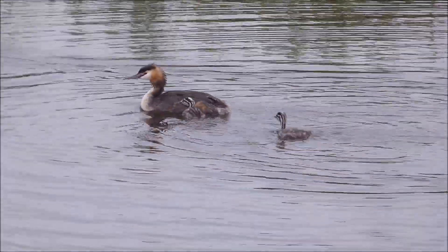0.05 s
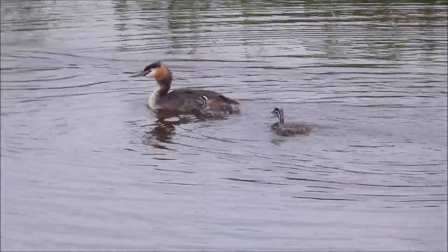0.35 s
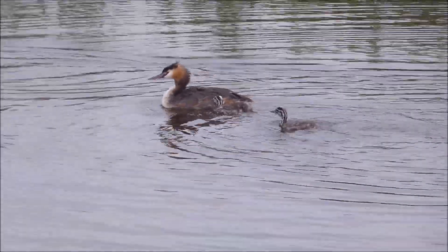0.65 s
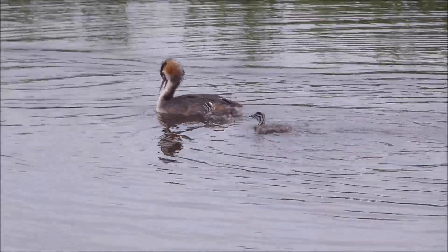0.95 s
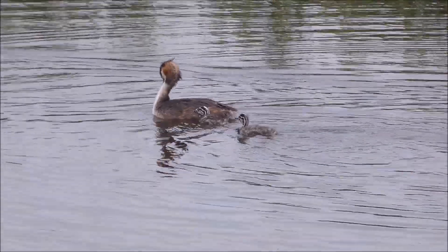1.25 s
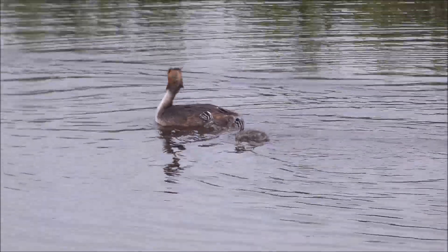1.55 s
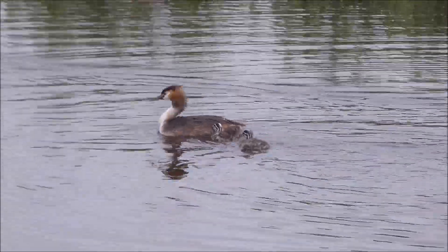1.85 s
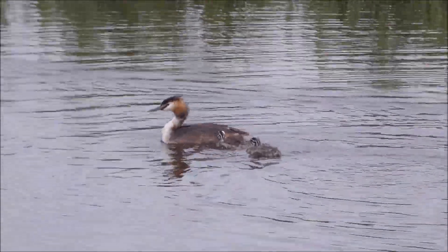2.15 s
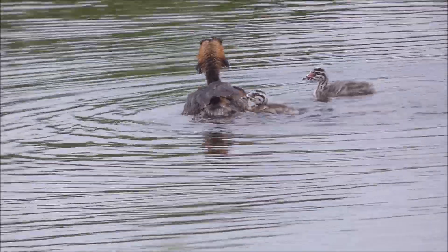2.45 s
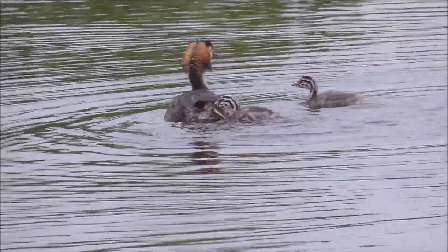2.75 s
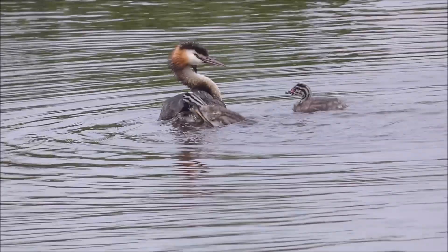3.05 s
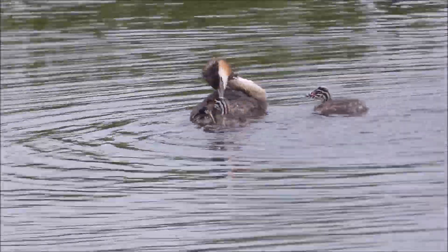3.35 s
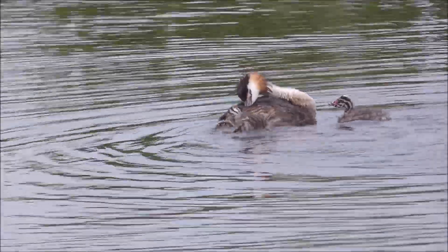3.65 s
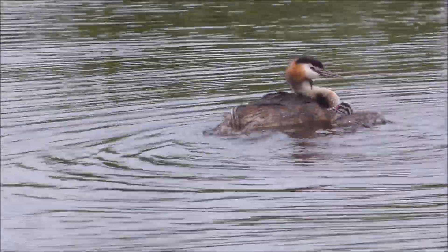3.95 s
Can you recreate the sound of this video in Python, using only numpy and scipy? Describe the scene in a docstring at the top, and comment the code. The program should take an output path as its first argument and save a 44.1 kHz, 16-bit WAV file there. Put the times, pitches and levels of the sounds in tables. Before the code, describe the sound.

Grebe chicks peep faintly and repeatedly on a pond while wind buffets the microphone over hiss and distant traffic. The sound cuts out briefly, then returns with louder traffic, fainter peeps and no gusts.

```python
"""Grebe chicks on a windy pond

Chicks peep, each peep leaping from a low register to a high whistle and back, and the bank echoes them.
Another water bird calls once and the water plips. Gusts buffet the microphone over hiss and far traffic.
The sound cuts out for a quarter second and returns with louder traffic, fainter peeps and no gusts."""
import sys
import numpy as np
from scipy import signal
from scipy.fft import rfft, irfft
from scipy.io import wavfile
from scipy.ndimage import uniform_filter1d

SR = 44100
rng = np.random.default_rng(int(sys.argv[2]) if len(sys.argv) > 2 else 0)


def file_out(sig):
    """Save sig as 16-bit WAV at sys.argv[1]."""
    # one column per channel
    cols = np.atleast_2d(sig).T
    # limit, then scale
    lim = np.clip(cols, -1, 1)
    pcm = np.round(lim * 32767).astype(np.int16)
    wavfile.write(sys.argv[1], SR, pcm)


N = 176400
T = np.arange(N) / SR
HZ = np.fft.rfftfreq(N, 1 / SR)
PAUSE_START_S, PAUSE_END_S = 2.3245, 2.5755


def amp(db):
    """Decibels to gain."""
    return 10 ** (np.asarray(db) / 20)


def unit(x):
    """Scale to rms 1."""
    return x / np.sqrt(np.mean(x ** 2) + 1e-20)


def curve(points, at, column=1):
    """Interpolate one table column linearly."""
    table = np.array(points, float)
    return np.interp(at, table[:, 0], table[:, column])


def spectrum(points):
    """Interpolate a table over log frequency."""
    hz, value = np.transpose(points)
    return np.interp(np.log(HZ + 1), np.log(hz), value)


def add(mix, start_s, sound):
    """Mix a sound in at start_s."""
    part = mix[max(round(start_s * SR), 0):][:len(sound)]
    part += sound[:len(part)]


def pan(db):
    """Channel gains; positive db is left."""
    return amp(np.array([[db], [-db]]) / 2)


def waver(rate_hz):
    """Random motion below rate_hz, rms 1."""
    return unit(irfft(rfft(rng.standard_normal(N)) / (1 + (HZ / rate_hz) ** 4), N))


def noise(gain, correlation):
    """Stereo noise of rms 1 with a given spectrum and left-right correlation."""
    mid, side = rfft(rng.standard_normal((2, N)))
    mid, side = mid * np.sqrt(1 + correlation), side * np.sqrt(1 - correlation)
    return unit(irfft(np.array([mid + side, mid - side]) * gain, N))


# Left-right likeness of hiss and traffic: freq_hz, correlation
AMBIENT_CORRELATION = [(20, 0.44), (150, 0.89), (300, 0.91), (600, 0.16), (1500, 0.36), (4000, 0.78),
                       (9000, 0.317), (16000, 0.25)]
# Hiss spectrum: freq_hz, gain_db
HISS_SPECTRUM = [(20, 0), (1000, 5), (2300, 0), (2800, 5), (3300, 1), (4000, 2.5), (4600, -3), (5200, 1),
                 (7000, -3), (8400, -7), (9900, -4.5), (11200, -12.5), (14000, -19.5), (16000, -47.5)]
# Hiss envelope: time_s, level_db
HISS_LEVEL = [(0, -57.5), (.8, -57), (1.45, -56.5), (1.8, -57), (2.3, -59), (2.6, -59.5), (4, -60.5)]


def hiss():
    """Smooth, leafy outdoor hiss."""
    level_db = curve(HISS_LEVEL, T) + 0.29 * waver(rate_hz=20)
    return noise(amp(spectrum(HISS_SPECTRUM)), spectrum(AMBIENT_CORRELATION)) * amp(level_db)


# Far rumble spectrum: freq_hz, gain_db
FAR_SPECTRUM = [(20, -35.5), (70, -7.5), (140, -9.5), (220, 0.5), (300, -12), (420, -6), (560, -14.5),
                (680, -9.5), (800, -15.5), (1100, -21.5), (1350, -22.5), (1500, -29.5), (1900, -20),
                (2300, -29), (4000, -50), (16000, -82)]
# Far rumble envelope: time_s, level_db
FAR_LEVEL = [(0, -46.5), (.5, -45.5), (1.1, -47.5), (1.6, -44.5), (1.85, -47), (2.33, -46)]
# Hum swell: time_s, level_db
HUM_LEVEL = [(1.65, -55), (1.82, -40), (1.95, -40), (2.1, -53.5)]


def far_traffic(hum_hz=245.5, hum_half_width_hz=65):
    """Distant traffic: a dull rumble with a low hum that swells once."""
    hum = noise(1 / (1 + ((HZ - hum_hz) / hum_half_width_hz) ** 4), correlation=0.9)
    rumble = noise(amp(spectrum(FAR_SPECTRUM)), spectrum(AMBIENT_CORRELATION))
    rumble_db = curve(FAR_LEVEL, T) + 2.07 * waver(rate_hz=8.6)
    return hum * amp(curve(HUM_LEVEL, T)) + rumble * amp(rumble_db)


# Near rumble spectrum: freq_hz, gain_db
NEAR_SPECTRUM = [(20, -39), (40, -24.5), (65, -13.5), (100, -10), (135, 0.5), (195, 2), (260, -10),
                 (400, -5), (520, -13), (650, -8), (715, -19.5), (830, -13.5), (1050, -23), (1250, -25),
                 (1520, -51), (1900, -35), (2200, -35), (4000, -49), (16000, -82)]
# Near rumble envelope: time_s, level_db
NEAR_LEVEL = [(2.57, -38.5), (2.92, -37), (3.05, -37.5), (3.35, -41), (3.5, -39), (4, -38)]
# Traffic resonances: centre_hz, half_width_hz, level_db
DRONES = [(454, 32, -51), (774, 37, -53.5), (1333, 51, -59), (1744, 81, -60.5)]


def near_traffic(pan_db=-3):
    """Nearer traffic: a fuller rumble to the right, with droning resonances."""
    out = noise(amp(spectrum(NEAR_SPECTRUM)), spectrum(AMBIENT_CORRELATION))
    out *= amp(curve(NEAR_LEVEL, T) + 0.37 * waver(rate_hz=20))
    for centre_hz, half_width_hz, level_db in DRONES:
        drone = noise(1 / (1 + ((HZ - centre_hz) / half_width_hz) ** 2), correlation=0.65)
        out += drone * amp(level_db + 2.54 * waver(rate_hz=29))
    return out * pan(pan_db)


# Turbulence spectrum: freq_hz, gain_db
WIND_SPECTRUM = [(20, -37.5), (45, -28), (75, -3), (125, 1), (210, -1.5), (300, -7), (450, -29), (900, -46),
                 (3000, -56.5), (16000, -89.5)]
# Left-right likeness of the turbulence: freq_hz, correlation
WIND_CORRELATION = [(20, 0.76), (120, 0.78), (250, 0.63), (600, 0.99)]
# Gust envelope: time_s, level_db
GUSTS = [(0, -36.5), (.07, -37.5), (.17, -47.5), (.23, -31.5), (.28, -57), (.42, -40.5), (.5, -36),
         (.56, -34.5), (.61, -33), (.675, -34), (.72, -30), (.81, -37), (.85, -29.5), (.91, -32),
         (1.08, -47.5), (1.15, -49), (1.33, -45), (1.42, -74), (2.06, -51), (2.09, -30.5), (2.22, -31.5),
         (2.255, -32.5), (2.29, -31.5), (2.324, -24)]
# Hardest eddies: centre_s, freq_hz, peak_db, pan_db, half_width_cycles
BUFFETS = [(.025, 207, -17.5, -0.5, 0.61), (0.065, 152, -23, 0, 0.57), (0.226, 142, -25.5, -5, 0.45),
           (0.54, 139, -17.5, 1, 0.54), (.555, 142, -17.5, 2, 0.52), (.572, 152, -20, -4, .6),
           (0.762, 163, -19.5, 0, 0.63), (0.777, 246, -18.5, -6, 0.57), (0.837, 152, -23.5, -6, 1.2),
           (0.854, 176.6, -14, 1, 0.47), (2.115, 166, -15.5, 6.5, 0.61), (2.233, 354, -25, -13.5, 0.51),
           (2.293, 212, -17, 2.5, 1.27), (2.321, 182, -10.5, -1.5, 0.24)]


def wind(port_offset_cycles=0.067):
    """Low turbulence on the microphone; hard eddies thump one port just after the other."""
    out = noise(amp(spectrum(WIND_SPECTRUM)), spectrum(WIND_CORRELATION))
    out *= amp(curve(GUSTS, T) + 2.07 * waver(rate_hz=47))
    port_offsets = np.array([[-1], [1]]) * port_offset_cycles
    for centre_s, freq_hz, peak_db, pan_db, half_width_cycles in BUFFETS:
        cycles = (T - centre_s) * freq_hz + port_offsets
        thump = np.exp(-0.5 * (cycles / half_width_cycles) ** 2) * np.cos(2 * np.pi * cycles)
        out += thump * amp(peak_db) * pan(pan_db)
    return out


def click(level_db=-34.5, swell_s=0.0012):
    """A broadband tick as the sound cuts out."""
    envelope = amp(level_db) * np.exp(-abs(T - PAUSE_START_S) / swell_s)
    return noise(1 / (1 + HZ / 4000), correlation=0.48) * envelope


def bank_echo(x, echo_s=0.04, spread_s=0.012, echo_db=-12.5, highpass_hz=3180, tail_db=-8, t60_s=0.31):
    """The bank returns one bright, smeared echo and a diffuse tail, both stronger after the pause."""
    t = T[:SR // 2]
    tail, echo = rng.standard_normal((2, 2, len(t)))
    tail *= amp(-60 * t / t60_s)
    echo *= np.exp(-((t - echo_s) / spread_s) ** 2)
    echo = signal.sosfilt(signal.butter(4, highpass_hz, "high", fs=SR, output="sos"), echo)
    response = amp(tail_db) * tail / np.linalg.norm(tail[0])
    response += amp(echo_db) * echo / np.linalg.norm(echo[0])
    send = x * amp(3.5 * (T > PAUSE_END_S))
    return signal.fftconvolve(send[None], response, axes=1)[:, :N]


# Bubble resonances: pitch_hz, level_db, t60_s
BUBBLES = [(1230, -33, 0.024), (1650, -40.5, 0.0337), (2610, -43, .03)]


def plip(start_s=1.777, attack_s=0.0011):
    """A small splash rings a few bubbles."""
    t = np.maximum(T - start_s, 0)
    ring = sum(amp(db - 60 * t / t60_s) * np.sin(2 * np.pi * hz * t) for hz, db, t60_s in BUBBLES)
    return (1 - np.exp(-t / attack_s)) * ring


# Call contour: time_s, pitch_hz, level_db
HONK = [(.07, 580.4, -69), (.11, 644, -53), (.138, 629.5, -51.5), (.155, 668, -52), (.2, 598, -52.5),
        (.215, 565, -54), (.23, 510, -74.5)]
# Harmonics, fundamental first: gain_db
HONK_HARMONICS = [2.5, -6, -0.5, -14.5, -13.5, -15, -13.5]


def honk(jitter=0.0077, rasp=0.37):
    """A water bird's arched nasal call, with a strong third harmonic and a slight rasp."""
    pitch_hz = curve(HONK, T) * (1 + jitter * waver(rate_hz=150))
    phase = 2 * np.pi * np.cumsum(pitch_hz) / SR
    voice = sum(amp(db) * np.sin(k * phase) for k, db in enumerate(HONK_HARMONICS, 1))
    voice *= 1 + rasp * waver(rate_hz=150)
    gate = (T > HONK[0][0]) * (T < HONK[-1][0])
    return np.sqrt(2) * voice * amp(curve(HONK, T, column=2)) * gate


EDGE_S, JITTER, SHIMMER_DB, FRAY_HZ = 0.0025, 0.0055, 2.05, 260
STRAIN_FROM_HZ, STRAIN_DB_PER_HZ = 4050, -0.018  # the voice thins at the top of its range


def chick_note(shape, length_s, pitch_scale, level_db, hoarse, undertone_db=-60, arch=1):
    """An unsteady whistle over a faint lower octave; hoarse is the power share frayed into noise."""
    t = np.arange(0, length_s + EDGE_S, 1 / SR)
    progress = t / t[-1]
    flutter = uniform_filter1d(rng.standard_normal((2, SR // 4)), size=130)
    jitter, shimmer = (unit(row)[:len(t)] for row in flutter)
    pitch_hz = pitch_scale * curve(shape, progress) ** arch
    phase = 2 * np.pi * np.cumsum(pitch_hz * (1 + JITTER * jitter)) / SR
    lowpass = signal.butter(2, FRAY_HZ, fs=SR, output="sos")
    drift = unit(signal.sosfilt(lowpass, rng.standard_normal((2, SR // 4))))[:, :len(t)]
    fray = drift[0] * np.sin(phase) + drift[1] * np.cos(phase)  # noise band around the pitch
    voice = np.sqrt(1 - hoarse) * np.sin(phase) + np.sqrt(hoarse / 2) * fray
    undertone = amp(undertone_db) * np.sin(phase / 2)
    gate = np.clip(np.minimum(t, t[-1] - t) / EDGE_S, 0, 1)
    strain_db = STRAIN_DB_PER_HZ * np.maximum(pitch_hz - STRAIN_FROM_HZ, 0)
    envelope = gate * amp(level_db + curve(shape, progress, column=2) + SHIMMER_DB * shimmer + strain_db)
    return np.sqrt(2) * envelope * (voice + undertone)


def hoarseness(start_s):
    """The peeps are noisier after the pause."""
    return 0.14 if start_s > PAUSE_END_S else 0.02


# Peeps: start_s, length_s, top_hz, whistle_db, lead_db, tail_db, tail_end_hz, arch_exponent
ROUND_PEEPS = [(.256, 0.069, 3980, -53, -45.5, -62, 2400, 1), (.476, 0.071, 4060, -52, -55, -61, 1630, 1),
               (.813, 0.063, 3916, -52, -54.5, -59, 2230, 0.8),
               (1.045, 0.06, 4066, -52.5, -54, -55, 1660, 0.78),
               (1.272, 0.063, 4030, -50.5, -58, -51, 1640, 0.83),
               (1.604, 0.05, 3840, -53, -56.5, -59.5, 2890, 0.2),
               (1.820, 0.056, 4180, -50.5, -54, -51.5, 1680, 1.1),
               (2.162, 0.051, 3870, -58.5, -59, -56.5, 2556, 0.32),
               (2.622, .056, 4020, -58, -56, -54, 2660, 0.64),
               (2.865, 0.035, 4130, -56.5, -53.5, -55.5, 2520, 0.36),
               (3.440, 0.042, 4060, -58, -59, -57, 2610, 0.5),
               (3.660, 0.045, 4170, -58.5, -64, -54, 1880, 0.44)]
PEAKED_PEEPS = [(.170, 0.051, 4320, -47.5, -44, -60, 1830, 0.86),
                (.712, .066, 4530, -54.5, -46, -62, 2420, 1), (.948, .066, 4550, -54, -47, -65, 2330, 0.96),
                (1.160, 0.072, 4680, -56, -46, -76.5, 2400, 1),
                (1.384, 0.075, 4770, -58, -50.5, -66, 2050, 0.95)]
# Whistle contours: progress, pitch_ratio, gain_db
ROUND_SHAPE = [(0, .93, -4), (.15, .98, -2), (.35, 1, -1), (.6, .983, -1.5), (.82, .94, -2), (1, .87, -5)]
PEAKED_SHAPE = [(0, .8, -1), (.07, .87, 0), (.13, .985, -1), (.24, 1, 0), (.38, .945, -1), (.48, .83, -1),
                (1, .72, -4)]
# Low-register lead-in, played 2% flat: progress, nominal_hz, gain_db
LEAD_IN = [(0, 1800, -17.5), (0.4, 2610, -5), (0.7, 2788, -2), (1, 2920, -9)]
# Single slides, played 1% flat: start_s, length_s, nominal_from_hz, nominal_to_hz, level_db
SLIDES = [(0, 0.0041, 1930, 1710, -53), (0.491, 0.022, 1770, 2280, -52.5),
          (1.554, 0.034, 1710, 2096, -52.5), (2.061, 0.013, 1810, 1990, -53.5),
          (2.077, 0.028, 3780, 3490, -61.5), (2.312, 0.012, 1780, 2160, -52.5),
          (3.172, 0.026, 1680, 2320, -57.5), (3.205, 0.047, 3070, 2790, -61),
          (1.549, 0.034, 3500, 4000, -59.5), (3.700, .022, 4150, 4080, -63.5),
          (3.722, 0.015, 3750, 3000, -61)]


def chicks(lead_s=0.025, tail_s=0.027, tail_from_hz=2950, min_knee_hz=2615, fade_db=-4.5):
    """A peep is a low lead-in, a leap to the whistle and a drop to a falling tail; some notes just slide."""
    out = np.zeros(N)
    for peeps, shape in (ROUND_PEEPS, ROUND_SHAPE), (PEAKED_PEEPS, PEAKED_SHAPE):
        for start_s, length_s, top_hz, whistle_db, lead_db, tail_db, tail_end_hz, arch in peeps:
            hoarse = hoarseness(start_s)
            knee_hz = max(min_knee_hz, (tail_from_hz + tail_end_hz) / 2)
            tail = [(0, tail_from_hz, 0), (0.5, knee_hz, fade_db / 2), (1, tail_end_hz, fade_db)]
            add(out, start_s - lead_s, chick_note(LEAD_IN, lead_s, 0.98, lead_db, hoarse))
            whistle = chick_note(shape, length_s, top_hz, whistle_db, hoarse, undertone_db=-14, arch=arch)
            add(out, start_s, whistle)
            add(out, start_s + length_s, chick_note(tail, tail_s, 1, tail_db, hoarse))
    for start_s, length_s, from_hz, to_hz, level_db in SLIDES:
        slide = [(0, from_hz, 0), (1, to_hz, 0)]
        add(out, start_s, chick_note(slide, length_s, 0.99, level_db, hoarseness(start_s)))
    return out


def scene():
    """Pond and hiss throughout; wind and far traffic before the pause, nearer traffic after it."""
    pond = chicks() + honk() + plip()
    throughout = pond * pan(db=2) + bank_echo(pond) + hiss()
    before_pause = wind() + far_traffic() + click()
    return throughout + np.where(T < PAUSE_START_S, before_pause, near_traffic())


def record(dry, fade_s=0.0006, cutoff_hz=15700):
    """Mute the pause, then low-pass."""
    outside_pause_s = np.maximum(PAUSE_START_S - T, T - PAUSE_END_S)
    gate = np.clip(outside_pause_s / fade_s + 0.5, 0, 1)
    lowpass = signal.firwin(511, cutoff_hz, window=("kaiser", 9), fs=SR)
    return signal.oaconvolve(dry * gate, lowpass[None], "same")


dry = scene()
out = record(dry)
file_out(out)
```